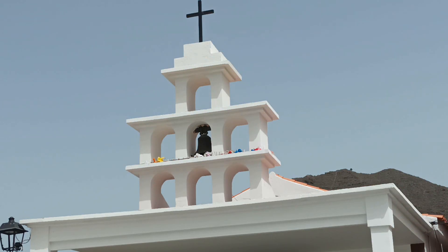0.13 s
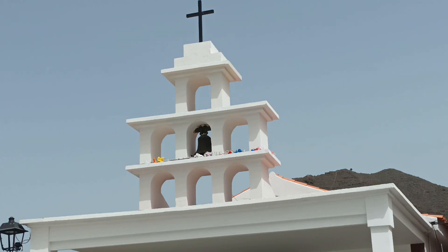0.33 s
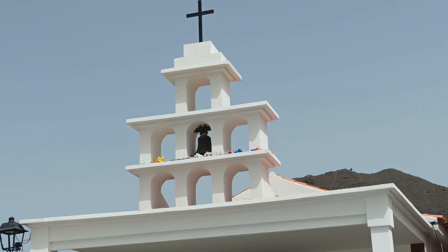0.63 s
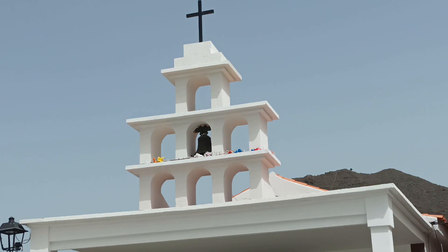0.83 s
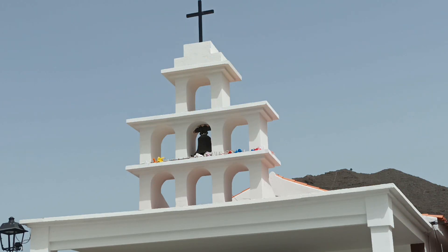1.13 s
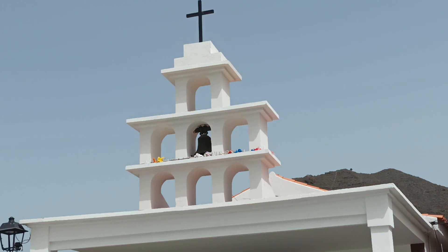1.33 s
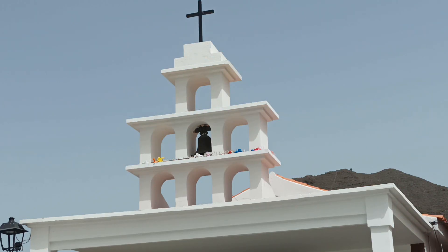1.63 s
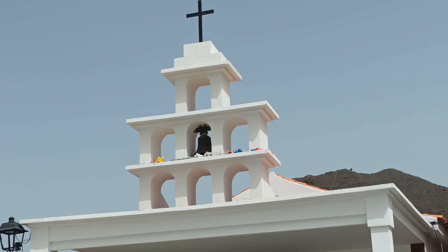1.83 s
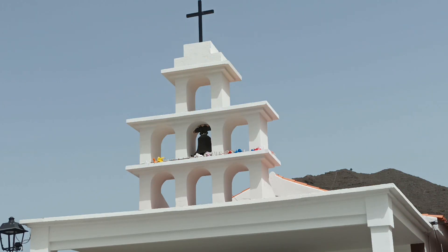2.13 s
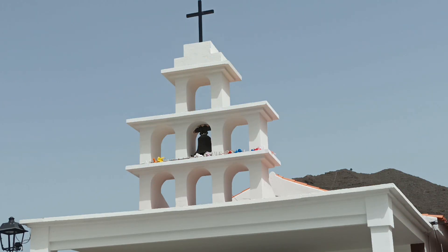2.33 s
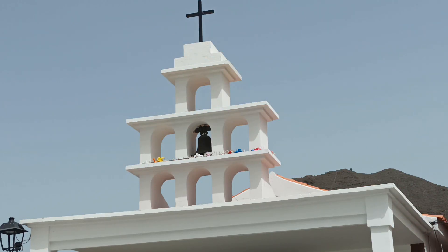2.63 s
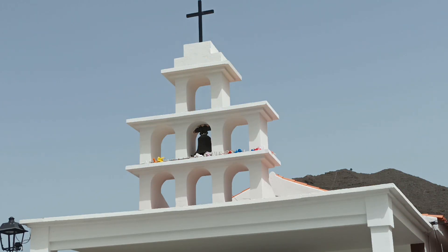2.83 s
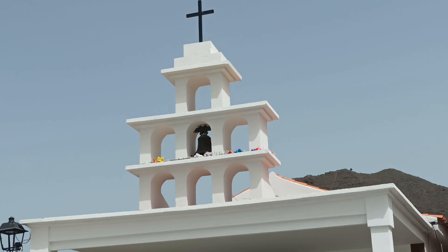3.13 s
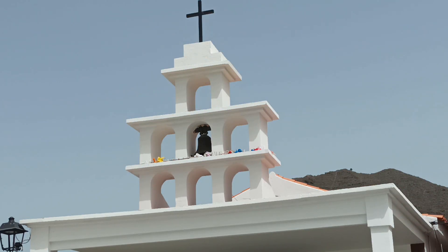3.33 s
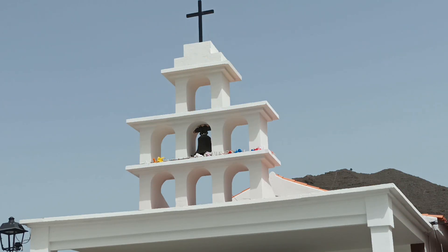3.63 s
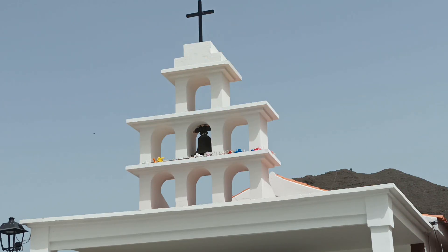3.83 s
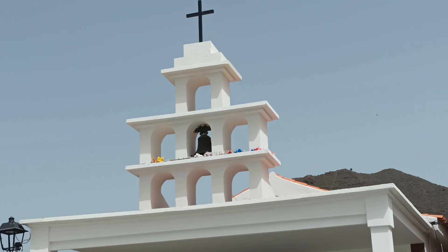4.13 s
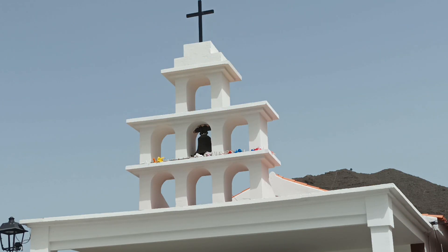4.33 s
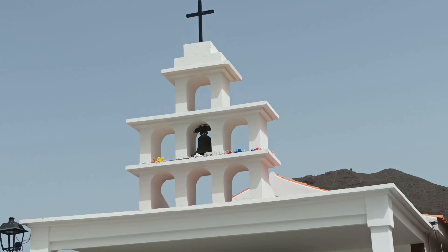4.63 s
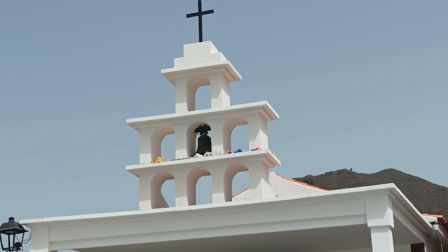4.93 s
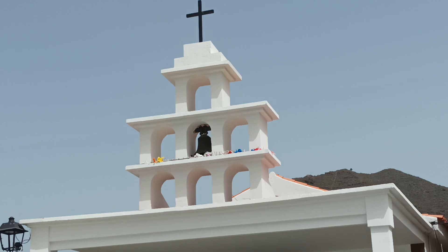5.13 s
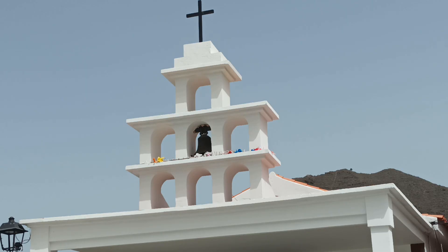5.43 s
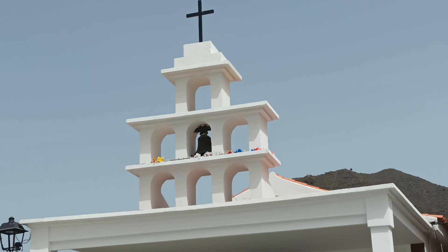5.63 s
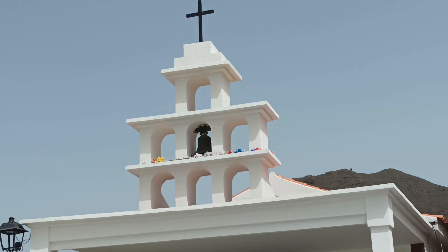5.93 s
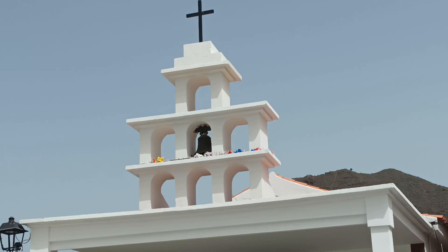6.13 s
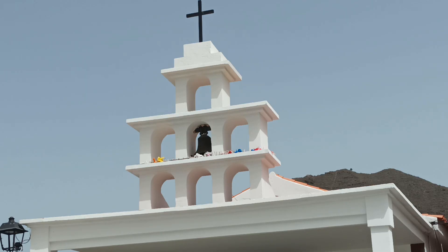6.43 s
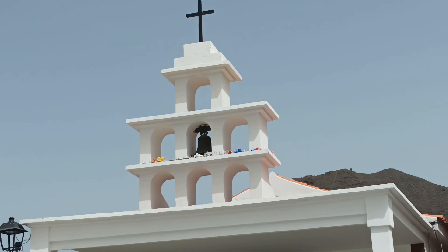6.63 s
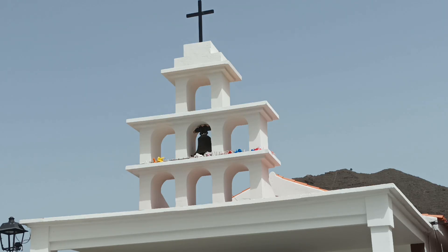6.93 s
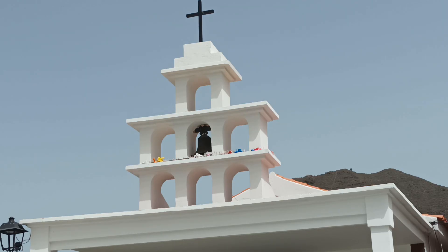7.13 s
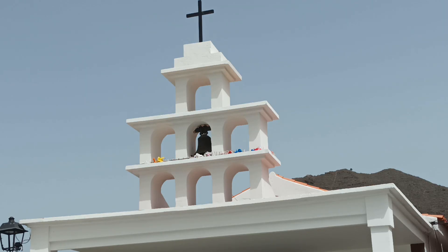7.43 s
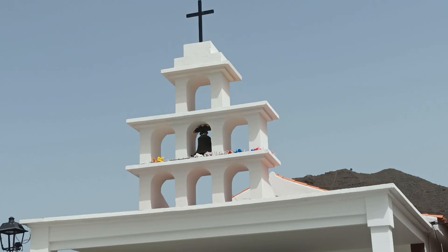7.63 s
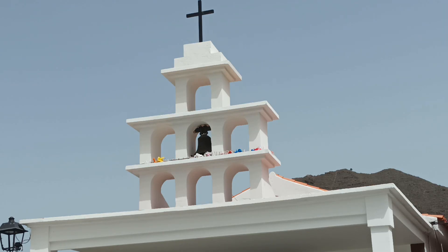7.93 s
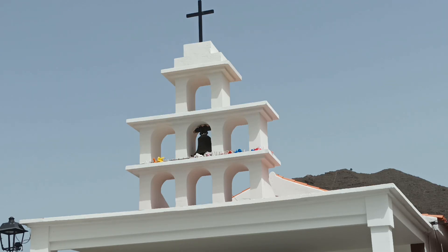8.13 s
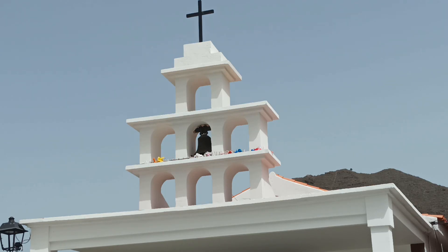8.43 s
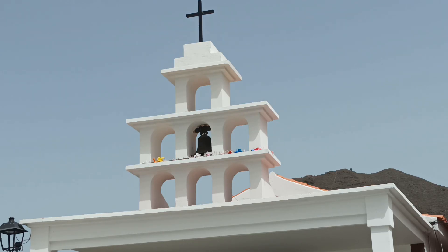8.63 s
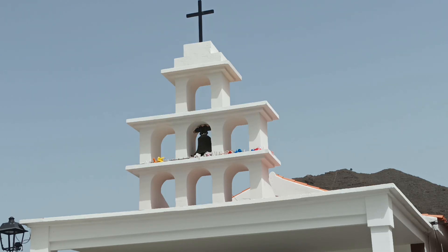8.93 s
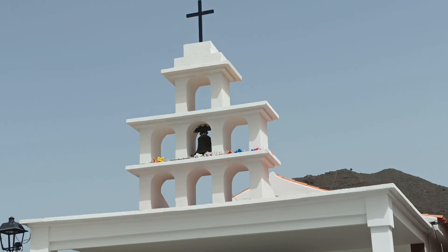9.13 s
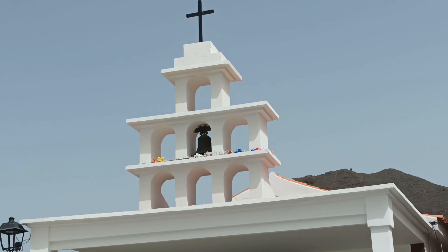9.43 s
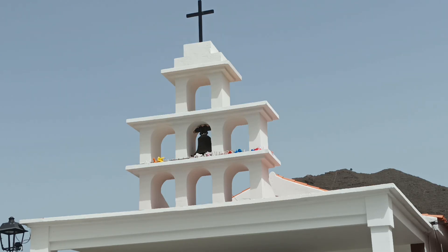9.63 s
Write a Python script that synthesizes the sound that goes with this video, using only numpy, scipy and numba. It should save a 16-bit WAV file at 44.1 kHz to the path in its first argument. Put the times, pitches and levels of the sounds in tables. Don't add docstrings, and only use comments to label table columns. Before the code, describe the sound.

Fairly close outdoor stereo pickup of a single church bell tolling steadily. A small linkage tick precedes most blows; each clang is sharp and bright, quickly mellowing to a steady, pulsing hum that lasts into the next stroke. The hammer knocks dully on its rest. Behind are faint leaves, far rumble, small cloth rustles, one distant dove call and left-sided wind buffets. The microphone level ducks slightly at each blow.

```python
import sys
import numpy as np
from scipy import signal
from scipy.fft import rfft, irfft, next_fast_len
from scipy.io import wavfile
from scipy.ndimage import map_coordinates
from numba import njit

SR = 44100
rng = np.random.default_rng(int(sys.argv[2]) if len(sys.argv) > 2 else 0)


def invert_db(x):
    u = np.asarray(x, float) / 20
    return 10 ** u


def unload_wav(signal):
    wavfile.write(
        sys.argv[1],
        SR,
        np.round(np.clip(np.atleast_2d(signal).T, -1, 1) * 32767).astype(np.int16),
    )


N = 430857
SIDES = np.array([[.5], [-.5]])

# start in seconds, blow in dB, brightness in dB per octave above the
# nominal, left-right difference in dB, linkage tick in dB.
STROKES = [
    (-1.554, 0, 0, 0, -70),
    (.746, 0, .3, -.5, -33),
    (3.046, .1, -.5, -1, -34),
    (5.346, .1, .4, .3, -55),
    (7.647, .1, -.2, .1, -33),
]
# hum, hum twin, prime, tierce, quint,
# nominal, all in dB.
LEFT_IN = [(-2.1, 6, -2, -3, .1, .1), (.1, .1, .1, -1, .1, -2), (-5, 4, 1, -2, 1.5, .6),
           (-1.5, -7, .1, 2, -2, -1), (.6, -8, -1, -1, .1, 1.5)]


def bell():
    hz, db, t60, start, pan, lead = partials()
    lows, pairs = len(LOW), len(LOW + UPPER + CROWN)
    long = t60 > 1.05
    groups = [(keep, ringing(hz[keep], t60[keep], blocks)) for keep, blocks in ((long, 410), (~long, 170))]
    fickle = np.clip(np.log2(hz / 1500), .06, 1)
    shape = rng.random(len(hz))
    shape[pairs:2 * pairs] = shape[:pairs]
    lead_in = 2 * SR
    out = np.zeros((2, N + 3 * lead_in))
    ends = [row[0] for row in STROKES[1:]] + [np.inf]
    for (s, blow_db, tilt, pan_db, _), left, end in zip(STROKES, LEFT_IN, ends):
        level = db + blow_db + tilt * np.log2(hz / 1724).clip(0) + SIDES * (pan + pan_db)
        level[:, :lows] += np.delete(left, 1)
        level[:, pairs:pairs + lows] += left[1:]
        level += .8 * fickle * rng.standard_normal(level.shape)
        cycles = shape + start + SIDES * lead + .13 * fickle * rng.standard_normal(level.shape)
        phasors = invert_db(level) * np.exp(2j * np.pi * cycles)
        for keep, ring in groups:
            length = ring.shape[1]
            stilled = np.clip((end - s - np.arange(length) / SR) / .012 + 1, 0, 1)
            sound = (phasors[:, keep].astype(np.complex64) @ ring).imag
            out[:, lead_in + round(s * SR):][:, :length] += sound * stilled
    return out[:, lead_in:lead_in + N]


# frequency in Hz, level in dB, t60 in seconds, twin offset
# in Hz, twin level in dB, beat start in cycles, left-right difference in dB, left lead in cycles,
# twin's left lead in cycles.
LOW = [
    (447.2, -22.4, 14, -10.33, -19, .01, -.4, -.07, .01),
    (764.4, -22.8, 10.2, -1.61, -19, -.05, -1.7, -.48, -.2),
    (1020.9, -23.5, 7.9, 1.18, -18.5, .35, 1.5, .48, .1),
    (1221.8, -20.7, 2.2, 2.13, -2.5, .34, .1, .02, -.02),
    (1724.2, -5.3, 1.85, 1.64, -12, .3, 2.2, -.05, -.08),
]
# frequency in Hz, level in dB, t60 in seconds, twin offset
# in Hz, twin level in dB, beat start in cycles, left-right difference in dB.
UPPER = [(1917.6, -10.2, 1.3, -0.77, -13.1, -0.21, -0.8), (1939.4, -23.7, 1.72, 1.94, -2.3, -0.36, 1.9),
         (2098.2, -13, 0.75, -1.96, -4, -0.39, 0.1), (2293.5, -18, 0.76, 2.55, -2.1, 0.23, 1.1),
         (2489.8, -25.5, 1.09, 1.41, -3.5, 0.27, 2.4), (2594.1, -12.5, 1.7, -1.34, -13, -0.33, 0.2),
         (2700.3, -19.1, 1.45, 4.82, -6.1, -0.01, 4.4), (3169.2, -27.6, 1.3, -1.09, -0.1, 0.26, 0.3),
         (3304.0, -22, 1.17, -2.0, -6.8, -0.17, -2.3), (3560.7, -9, 1.42, 1.07, -13.5, -0.47, -0.1),
         (4126.5, -31.8, 1.35, -1.24, -9.6, 0.46, -2.8), (4206.1, -34.6, 1.19, -3.13, -8.8, -0.28, -1.7),
         (4602.0, -21.8, 1.24, 2.62, -4.5, -0.44, -4.2)]
CROWN = [(4940.4, -33.7, 0.9, -1.09, -7.3, 0.29, -5.7), (5224.1, -34.9, 0.97, 2.57, -7.5, 0.07, -5.5),
         (5350.9, -34.2, 0.9, -1.33, -9.4, -0.42, -2.7), (5702.9, -27.3, 1.35, 1.35, -9.5, 0.2, -4.1),
         (6121.0, -35.3, 0.87, -4.94, -7.3, -0.37, -4.8), (6848.5, -28.5, 1.08, -8.35, -8.5, -0.49, -5.6),
         (8006.6, -43.2, 1.05, -2.89, -1.7, -0.23, -2.7), (9181.0, -44.0, 0.93, -5.33, -8.5, -0.12, 7.7),
         (9821.9, -51.4, 0.85, 13.43, -8.8, -0.38, 17.1), (10347.9, -44.5, 0.85, 2.95, -1.4, -0.49, 11.2),
         (11519.1, -50.7, 0.72, -3.68, -2.4, 0.35, 15.1)]
# frequency in Hz, level in dB, t60 in seconds.
SINGLES = [(2884, -22, .42), (3396, -28, .9), (3474, -26, 1.35), (3690, -20, .32), (3932, -35, 1.6),
           (4103, -33, 1.3), (4365, -39, .9), (4443, -39, .9), (4760, -33, .9), (4800, -41, .9),
           (6163, -42, .8), (6259, -40, .9), (6450, -45, .65), (6550, -46, .65), (6778, -44, .8),
           (7600, -50, .6), (8180, -45, .85), (8615, -43, .8), (9330, -52, .6), (10020, -49, .7),
           (10067, -51, .7), (10111, -51, .7), (10812, -48, .5), (11250, -55, .45), (11800, -56, .4),
           (12400, -57, .6), (12680, -55, .6), (13830, -59, .35)]
# frequency in Hz, level in dB.
SHIMMER = [(2000, -27), (4000, -31), (5500, -38), (7500, -44), (10000, -49), (13000, -54), (15500, -66)]


def partials(shimmer_count=75):
    paired = LOW + [(*row, 0, 0) for row in UPPER + CROWN]
    hz, db, t60, split, twin_db, start, pan, lead, twin_lead = np.transpose(paired)
    draw = rng.random((shimmer_count, 3))
    weak_hz = 3000 * (15200 / 3000) ** draw[:, 0]
    weak_db = along(SHIMMER, weak_hz) - 2 - 9 * draw[:, 1]
    weak_t60 = .6 * (5000 / weak_hz) ** .5 * (.6 + .6 * draw[:, 2])
    weak = np.hstack([np.transpose(SINGLES), [weak_hz, weak_db, weak_t60]])
    flat = 0 * weak[0]
    apart = .6 * np.log2(weak[0] / 3000).clip(0, 1) * (rng.random(len(flat)) - .5)
    weak_pan = 14 * np.log2(weak[0] / 6000).clip(-.2)
    # Hz, dB, t60 s, start cycles, left-right dB, left lead cycles
    main = [hz, db, t60, 0 * hz, pan, lead]
    twin = [hz + split, db + twin_db, t60, start, pan, twin_lead]
    return np.hstack([main, twin, [*weak, flat, weak_pan, apart]])


def ringing(hz, t60, blocks, size=256):
    pole = (2j * np.pi * hz - np.log(1000) / t60)[:, None] / SR
    coarse = np.exp(pole * np.arange(blocks) * size).astype(np.complex64)
    fine = np.exp(pole * np.arange(size)).astype(np.complex64)
    ring = (coarse[:, :, None] * fine[:, None]).reshape(len(hz), -1)
    rise_s = .009 + .07 * np.exp(-(np.log2(hz[:, None] / 900) / .75) ** 2)
    ring[:, :SR // 4] *= 1 - np.exp(-np.arange(SR // 4) / SR / rise_s).astype(np.float32)
    return ring


TICK_LEAD_S, TICK_T60_S = .021, .08
RECOIL_S, RECOIL_DB = .068, -41
LAND_S, FLIGHT_S, SHRINK = .288, .158, .76
LAND_DB, LOSS_DB, REST_T60_S = -32, 2.4, .16
# frequency in Hz, density in dB per Hz.
CLANG = [(100, -30), (300, -14), (800, -12), (1500, -6), (3500, 0), (6000, -9), (10000, -22), (13000, -40),
         (15500, -54)]
# frequency in Hz, width in Hz, level in dB.
STOP = [(200, 90, 0), (330, 60, -2), (540, 50, 2), (720, 50, -3), (900, 150, -12), (1400, 300, -16)]


def hammer():
    def blows(db, t60, late=0):
        return [(s + late, db + blow_db, t60) for s, blow_db, *_ in STROKES[1:]]

    def rest(f):
        modes = [invert_db(db) * 1j * f * w / (c * c - f * f + 1j * f * w) for c, w, db in STOP]
        return sum((-1) ** k * mode for k, mode in enumerate(modes))

    clang = after(blows(-20.5, .07), .004) + after(blows(-41, .9), .006)
    bounces = blows(RECOIL_DB, REST_T60_S, RECOIL_S)
    for k in range(3):
        landing_s = LAND_S + FLIGHT_S * (1 - SHRINK ** k) / (1 - SHRINK)
        bounces += blows(LAND_DB - LOSS_DB * k, REST_T60_S, landing_s)
    tick = after([(s - TICK_LEAD_S, tick_db, TICK_T60_S) for s, *_, tick_db in STROKES[1:]], .003)
    thud = after(blows(-25, .16), .004) + invert_db(5) * after(bounces, .008) + tick
    contact = rush([(100, 0), (1500, 3), (5000, -6), (9000, -40)], [(300, .9), (900, .3)])
    knock = unit(filtered(contact, rest))
    return (clang + tick) * rush(CLANG, [(1000, .55)]) + thud * knock


# frequency in Hz, t60 in seconds.
YARD = [(200, .5), (2000, .6), (6000, .45), (14000, .2)]


def yard(x):
    hz, t, z = signal.stft(rng.standard_normal((2, SR // 2)), SR, nperseg=256)
    decay = invert_db(-60 * t / along(YARD, hz)[:, None])
    tail = signal.istft(z * decay, SR, nperseg=256)[1]
    late = np.pad(x, ((0, 0), (600, 0)))
    return signal.fftconvolve(late, tail / np.linalg.norm(tail[0]), axes=1)[:, :N]


SCOOP_HZ, SCOOP_S = 38, .035
SAG_HZ_PER_S2, SWELL = 165, .8
# start in seconds, length in seconds, pitch in Hz, level in dB.
COOS = [
    (4.4, .2, 505, -40),
    (4.67, .46, 506, -39),
]


def dove():
    out = np.zeros(N)
    for s, length, top_hz, db in COOS:
        t = np.clip(np.arange(N) / SR - s, 0, length)
        hz = top_hz - SCOOP_HZ * np.exp(-t / SCOOP_S) - SAG_HZ_PER_S2 * t ** 2
        swell = np.abs(np.sin(np.pi * t / length)) ** SWELL
        out += swell * invert_db(db + 3 + .8 * wobble(25)) * np.sin(2 * np.pi * np.cumsum(hz) / SR)
    return np.array([out, invert_db(-2.5) * np.roll(out, 9)])


# time in seconds, level in dB.
BREEZE = [(0, -53), (.9, -48), (2.6, -56), (3.5, -55), (5, -54), (6, -47), (7, -50), (8.2, -45), (9.2, -53),
          (9.77, -53)]
# time in seconds, level in dB, length in seconds.
EDDIES = [(.05, -42, .04), (.475, -36, .07), (1, -39, .07), (1.22, -42, .06), (2.12, -43, .05),
          (.68, -44, .12), (3.37, -48, .08), (5.36, -44, .05), (5.58, -40, .05), (5.69, -42, .08),
          (5.86, -41, .1), (6.13, -41, .08), (6.25, -34, .09), (6.365, -30, .06), (6.53, -45, .08),
          (6.77, -38, .07), (6.92, -39, .1), (7.26, -36, .04), (7.365, -29, .07), (7.54, -32, .06),
          (7.785, -37, .06), (7.93, -28, .09), (8.08, -40, .05), (8.22, -39, .05), (8.29, -42, .07),
          (8.505, -36, .07), (8.65, -39, .05), (8.79, -39, .05), (8.95, -35, .06), (9.675, -36, .07)]
# frequency in Hz, density in dB per Hz.
BUFFET = [(12, -64), (25, -28), (45, -9), (85, 2), (140, -4), (250, -19), (400, -30), (880, -120)]


def wind():
    breeze_db, = curves(BREEZE)
    t = np.arange(N) / SR
    push = invert_db(breeze_db + 1.5 * wobble(7))
    push += sum(invert_db(db) * np.exp(-(2 * (t - s) / length) ** 2) for s, db, length in EDDIES)
    lumps = invert_db(2.5 * np.array([wobble(24), wobble(24)]))
    buffet = unit(lumps * rush(BUFFET, [(30, .05)]))
    return invert_db([[5.2], [-7]]) * push * buffet


# time in seconds, level in dB, length in seconds.
RUSTLES = [(.136, -53, .004), (9.337, -53, .004), (.52, -74, .15), (1.21, -68, .05), (2, -74, .03),
           (2.1, -72, .05), (2.75, -70, .06), (3.76, -68, .05), (3.97, -68, .06), (4.12, -74, .03),
           (5.08, -71, .08), (7.95, -66, .04), (8.11, -66, .05), (9.15, -65, .05)]
# frequency in Hz, density in dB per Hz.
CLOTH = [(300, 0), (1000, -8), (3000, -10), (7000, -15), (11000, -19), (13500, -30), (16000, -70)]


def cloth():
    t = np.arange(N) / SR
    rustle = sum(invert_db(db + 5.5) * np.exp(-(2 * (t - s) / length) ** 4) for s, db, length in RUSTLES)
    return rustle * rush(CLOTH, [(1000, .3)])


# time in seconds, level in dB.
TREES = [(0, -55), (2.2, -53), (3.8, -55.5), (4.9, -54.5), (6.8, -57.5), (8.3, -55), (9.77, -56.5)]
# frequency in Hz, density in dB per Hz.
LEAVES = [(650, -35), (1100, -6), (1700, -1), (2800, -4), (3600, -11), (5000, -15), (6200, -22),
          (10500, -30), (15400, -42)]
# frequency in Hz, density in dB per Hz.
TOWN = [(25, -50), (60, -12), (120, 0), (250, -1), (400, -5), (650, -8), (1100, -14), (1600, -26),
        (3000, -90)]


def hillside():
    rumble = invert_db(-47.5 + .8 * wobble(3)) * rush(TOWN)
    leaves_db = curves(TREES)[0] + .6 * wobble(2.5) + [[.8], [-.8]]
    return rumble + invert_db(leaves_db) * rush(LEAVES)


# frequency in Hz, left-right likeness from -1 to 1.
ALIKE = [(60, .5), (300, .6), (700, .1), (1400, -.2), (3000, .2), (8000, .1)]


def rush(spectrum, alike=ALIKE):
    def response(hz):
        turn = np.arccos(np.clip(along(alike, hz), -1, 1)) / 2
        return invert_db(along(spectrum, hz)) * [np.cos(turn), np.sin(turn)]

    mid, side = filtered(rng.standard_normal((2, N)), response)
    return unit(np.array([mid + side, mid - side]))


def filtered(x, response):
    m = next_fast_len(N + SR // 2)
    return irfft(rfft(x, m) * response(np.fft.rfftfreq(m, 1 / SR)), m)[..., :N]


def after(events, rise):
    out, t = np.zeros(N + SR), np.arange(SR // 2) / SR
    for s, db, t60 in events:
        out[round(s * SR):][:len(t)] += (1 - np.exp(-t / rise)) * invert_db(db - 60 * t / t60)
    return out[:N]


def unit(x):
    return x / np.sqrt(np.mean(x ** 2) + 1e-20)


def along(points, hz):
    f, v = np.transpose(points)
    return np.interp(np.log(hz + 1), np.log(f + 1), v)


def curves(rows):
    s, *cols = np.transpose(rows)
    return [np.interp(np.arange(N) / SR, s, c) for c in cols]


def wobble(rate):
    return map_coordinates(rng.standard_normal(int(N * rate / SR) + 4), [np.arange(N) * rate / SR])


def scene():
    ring, iron = bell(), hammer()
    echo = yard(invert_db(-19.5) * ring + invert_db(-6) * iron)
    return ring + iron + echo + dove() + wind() + cloth() + hillside()


@njit
def follow(level, attack, release):
    out = level.copy()
    for i in range(1, len(level)):
        rate = attack if level[i] > out[i - 1] else release
        out[i] = out[i - 1] + rate * (level[i] - out[i - 1])
    return out


def roll_off(x):
    return signal.sosfilt(signal.butter(12, 15500, fs=SR, output="sos"), x)


def record(dry):
    level = follow(np.abs(dry).max(0), 1 / (.001 * SR), 1 / (.12 * SR))
    over_db = np.maximum(20 * np.log10(level + 1e-9) + 11, 0)
    mix = dry * invert_db(-.45 * over_db)
    return roll_off(mix)


dry = scene()
out = record(dry)
unload_wav(out)
```